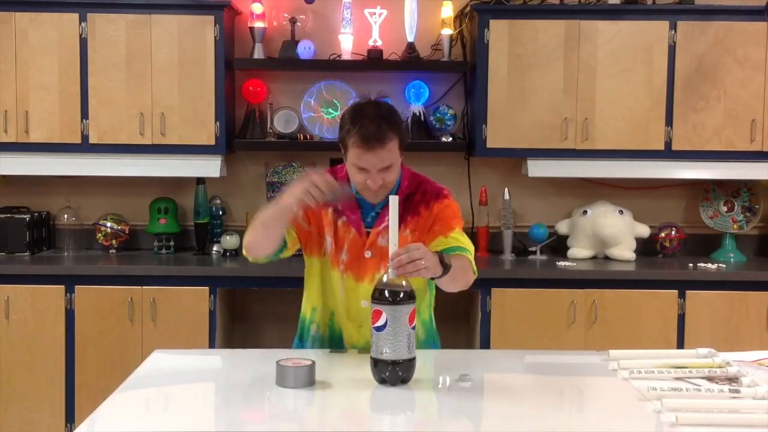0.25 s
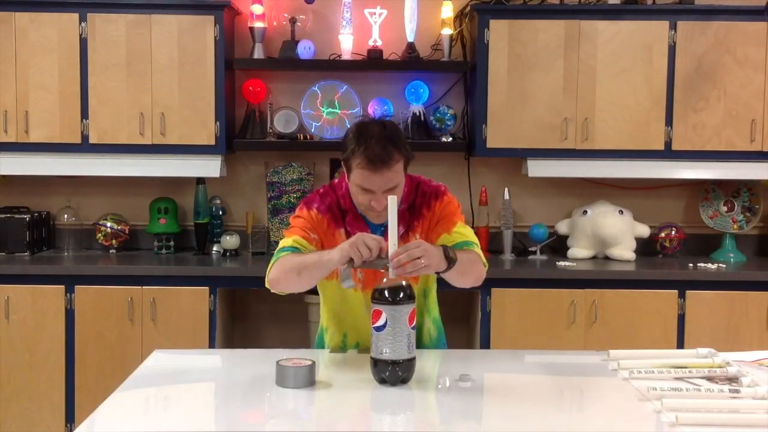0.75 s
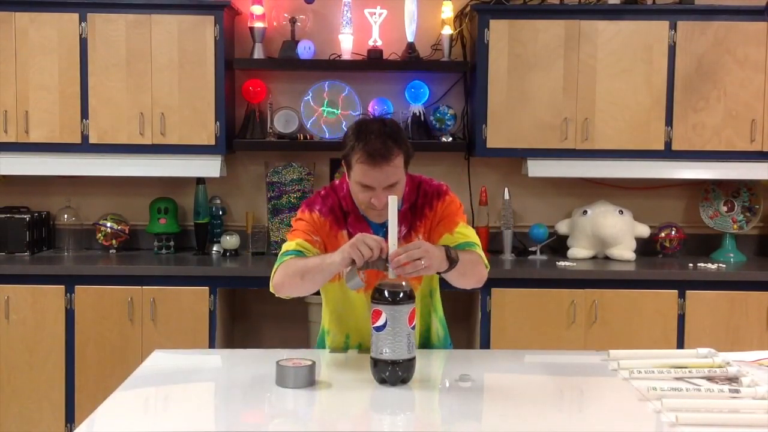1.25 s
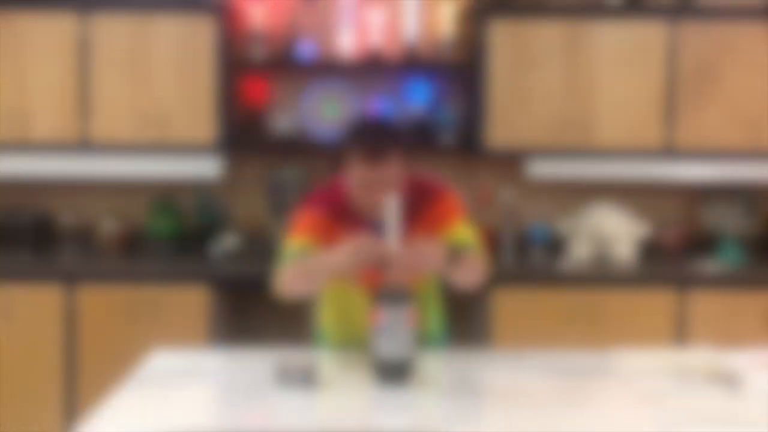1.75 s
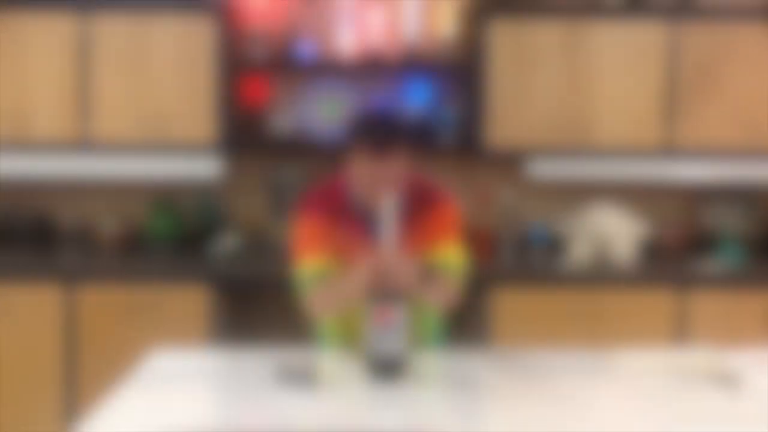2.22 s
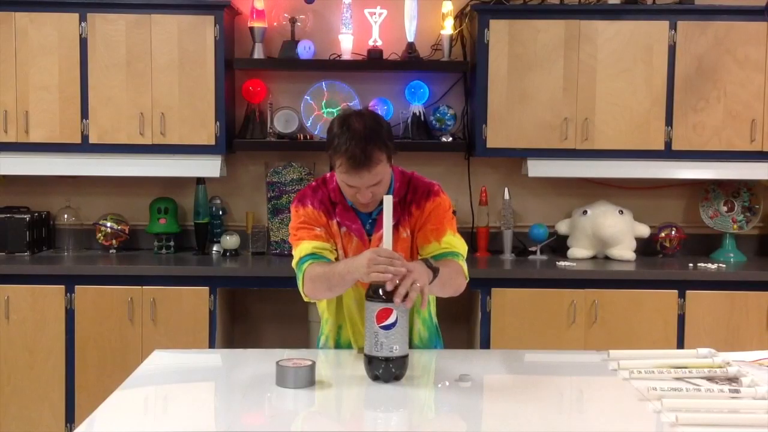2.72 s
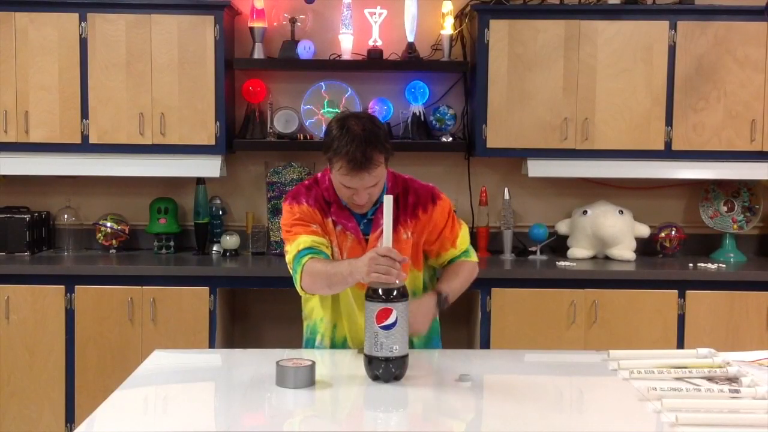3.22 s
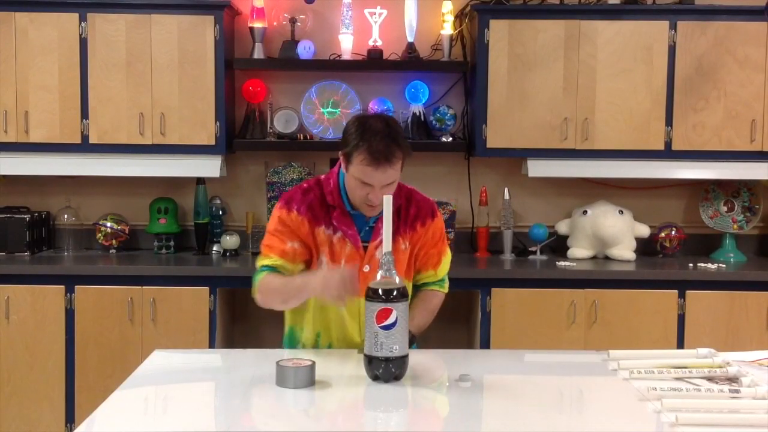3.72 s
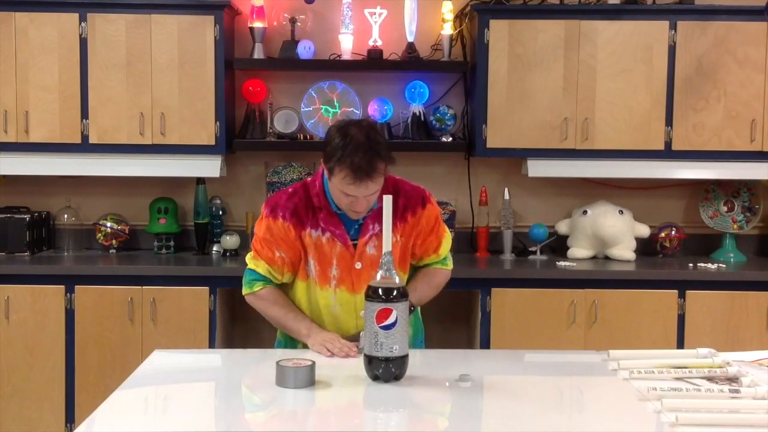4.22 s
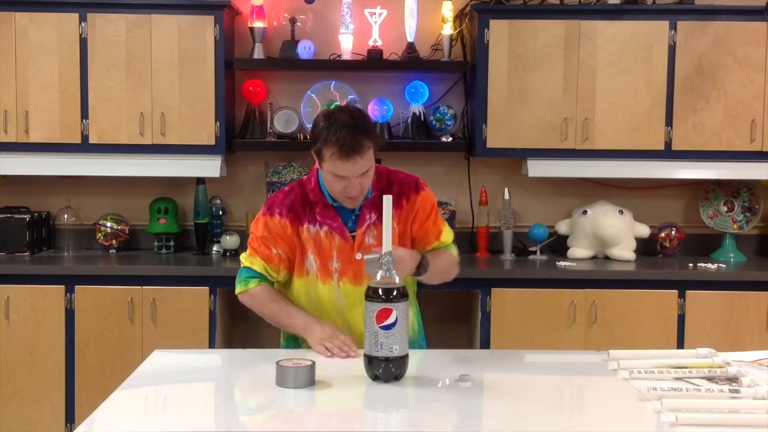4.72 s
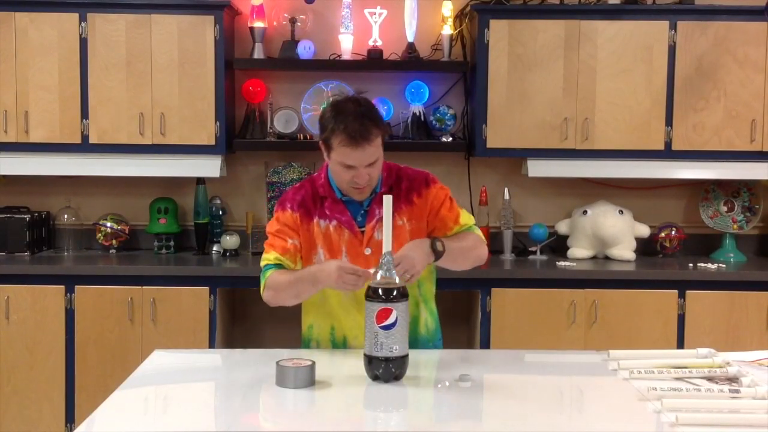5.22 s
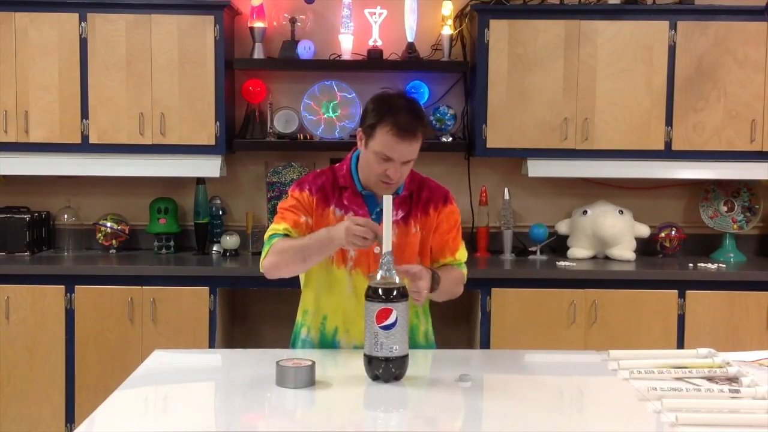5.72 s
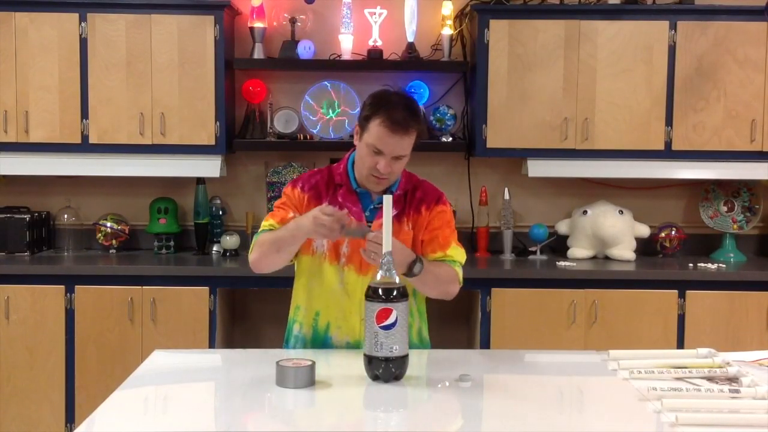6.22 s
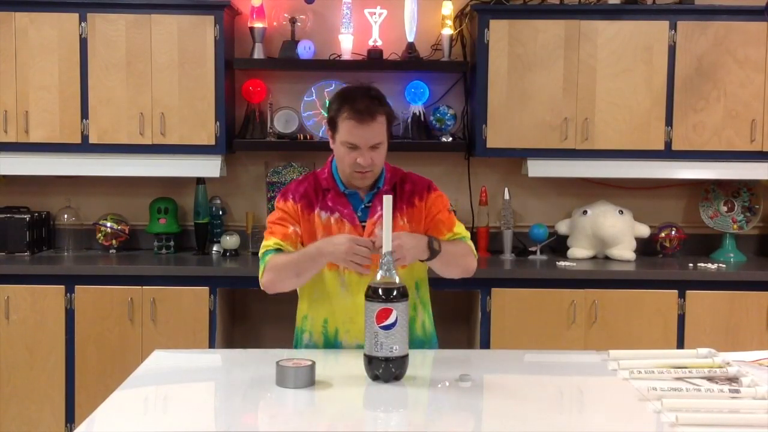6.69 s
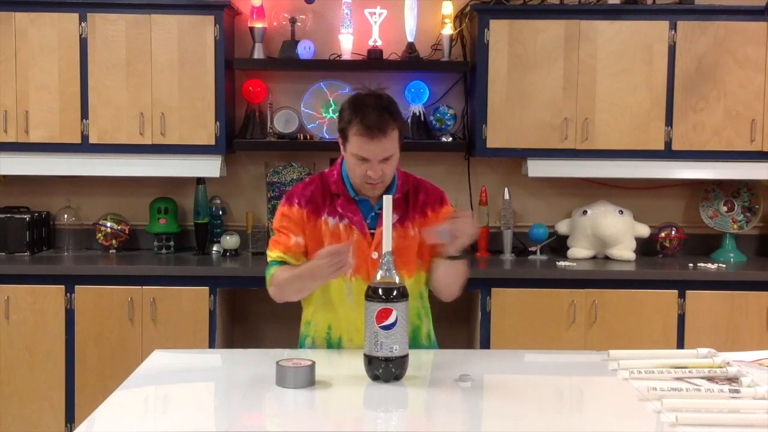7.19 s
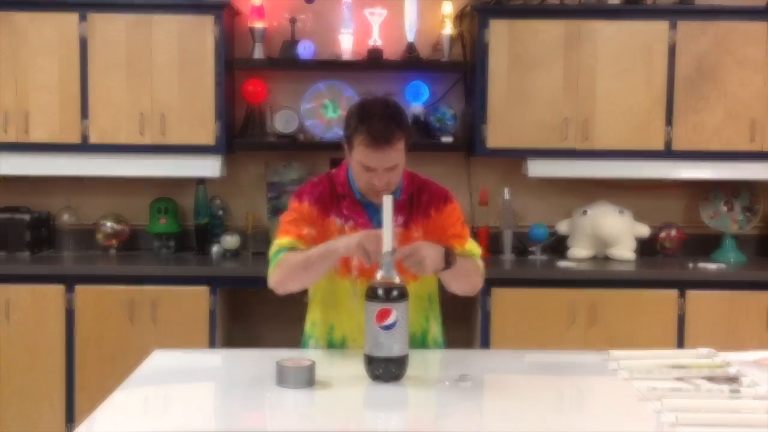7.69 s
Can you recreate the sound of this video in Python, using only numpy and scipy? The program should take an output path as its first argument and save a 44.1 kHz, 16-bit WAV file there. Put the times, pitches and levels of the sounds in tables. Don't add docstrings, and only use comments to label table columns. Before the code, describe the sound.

Heard from a few metres by a camera microphone: quiet humming lamps and hiss, dipping briefly early on. Fingers make tiny tape clicks and creases; midway, strong tape is yanked from the roll in stuttering, dry rips with bright room reflections. Sparse sticky ticks follow, one of them brighter, then the strip is torn across in one rapid zip, trailing small crinkles.

```python
import sys
import numpy as np
from scipy import signal
from scipy.fft import rfft, irfft, next_fast_len
from scipy.io import wavfile
from scipy.ndimage import map_coordinates

SR = 44100
rng = np.random.default_rng(int(sys.argv[2]) if len(sys.argv) > 2 else 0)


def voltage_ratio(level):
    return 10 ** (np.asarray(level, float) / 20)


def materialize(psi):
    bounded = np.clip(np.atleast_2d(psi).T, -1, 1)
    quanta = np.round(bounded * 32767).astype(np.int16)
    wavfile.write(sys.argv[1], SR, quanta)


N = 350585


def unit(x):
    return x / np.sqrt(np.mean(x ** 2) + 1e-20)


def along(points, hz):
    f, v = np.transpose(points)
    return np.interp(np.log(hz + 1), np.log(f + 1), v)


def wobble(rate):
    knots = rng.standard_normal(int(N * rate / SR) + 4)
    return map_coordinates(knots, [np.arange(N) * rate / SR])


def filtered(x, response):
    m = next_fast_len(len(x) + 4096)
    return irfft(rfft(x, m) * response(np.fft.rfftfreq(m, 1 / SR)), m)[:len(x)]


def toned(x, points):
    return filtered(x, lambda f: voltage_ratio(along(points, f)))


def modes(rows):
    def response(f):
        total = 0
        for k, (centre, width, db) in enumerate(rows):
            damping = 1j * f * width
            total = total + (-1) ** k * voltage_ratio(db) * damping / (centre * centre - f * f + damping)
        return total
    return response


def slips(size, rate, scatter_db):
    when, sign, big = rng.random((3, size))
    return (when < rate / SR) * np.sign(sign - 0.5) * voltage_ratio(-scatter_db * np.log(1.03 - big))


# (frequency [Hz], level [dB per Hz])
CRACKLE_TONE = [(150, -24), (500, -6.5), (2000, -5.5), (5000, -5), (9000, -7), (13000, -4.5), (15500, -10)]


def crackle(x):
    return unit(toned(x, CRACKLE_TONE))


# (frequency [Hz], width [Hz], level [dB])
ROLL_MODES = [(305, 77, 7), (457, 32, 10.5), (530, 205, 4.5), (988, 127, 11), (1290, 110, -9)]


def roll(x, body_db, hz, crackle_db):
    push = voltage_ratio(body_db + 0.52 * crackle_db) / (1 + (hz / 4500) ** 2)
    return push * unit(filtered(x, modes(ROLL_MODES)))


def bursts(rows, rate, scatter_db, sharp, body_db):
    out, t = np.zeros(N + SR), np.arange(SR // 5) / SR
    for s, db, length, hz, crackle_db in rows:
        rise = np.clip(t / (0.17 * length), 0, 1)
        fall = np.clip((length - t) / (0.47 * length) + 0.5, 0, 1)
        train = slips(len(t), rate, scatter_db)
        fine = slips(len(t), 3 * rate, scatter_db / 2)
        sound = unit(filtered(train, modes([(hz, hz / sharp, 0)])))
        sound += voltage_ratio(crackle_db) * crackle(train + fine)
        sound += roll(train, body_db, hz, crackle_db)
        out[round(s * SR):][:len(t)] += voltage_ratio(db) * rise * fall * sound
    return out[:N]


# (time [s], level [dB], length [s], strip resonance [Hz], crackle [dB])
JERK_PULLS = [
    (4.299, -38, 0.009, 2570, 3),
    (4.327, -41, 0.008, 2200, 7.5),
    (4.340, -47, 0.034, 1950, 4.5),
    (4.369, -35, 0.0095, 2100, -1.5),
    (4.384, -49, 0.014, 1300, -2),
    (4.427, -43, 0.012, 1800, 0.5),
    (4.499, -51.5, 0.0066, 4450, -13),
    (4.550, -36.5, 0.0096, 1520, -1.5),
    (4.561, -39.5, 0.029, 1530, 2),
    (4.583, -38, 0.012, 1190, -22),
]


def jerks():
    return bursts(JERK_PULLS, rate=3000, scatter_db=2.0, sharp=2.25, body_db=-2)


# (time [s], level [dB])
TEAR_LEVEL = [
    (7.12, -75.5),
    (7.143, -59.5),
    (7.155, -57),
    (7.162, -38.5),
    (7.173, -31),
    (7.181, -35.5),
    (7.2, -39.5),
    (7.214, -47),
    (7.23, -65),
]
# (frequency [Hz], level [dB per Hz])
WEAVE_TONE = [(180, -48), (300, -8), (360, -13.5), (935, -9), (1180, -3), (1930, -6.5), (3800, -3.5),
              (15400, -12)]
# (frequency [Hz], width [Hz], level over the broad tone [dB])
FLAP_MODES = [(1130, 270, 2), (2230, 300, 6), (3820, 280, 0), (5300, 450, -1), (6360, 320, 5)]


def tear():
    t = np.arange(N) / SR
    s, level = np.transpose(TEAR_LEVEL)
    db = np.interp(t, s, level)
    rate = 1220 + (1275 - 1220) * voltage_ratio(2 * (db - db.max()))
    turns = np.cumsum(rate * (1 + 0.07 * wobble(300))) / SR
    threads = np.diff(np.floor(turns), prepend=0) * voltage_ratio(1.3 * rng.standard_normal(N))
    train = unit(threads) + 1.9 * unit(slips(N, 14000, scatter_db=3.0))
    inside = np.interp(t, [s[0], s[-1]], [1, 1], 0, 0)

    def strip(f):
        return voltage_ratio(along(WEAVE_TONE, f)) * (1.5 + sum(modes([m])(f) for m in FLAP_MODES))
    return inside * voltage_ratio(db) * unit(filtered(train, strip))


def snaps(rows, second, body_db):
    out, t = np.zeros(N + SR), np.arange(SR // 20) / SR
    decay = voltage_ratio(-60 * t / 0.011)
    for s, db, hz, crackle_db in rows:
        crack = (t == 0) + 0.3 * decay * rng.standard_normal(len(t))
        spray = np.minimum(t / 0.0015, 1) * decay * rng.standard_normal(len(t))
        high = second * hz
        ring = unit(filtered(crack, lambda f: modes([(hz, hz / 2.2, 0)])(f) ** 2))
        ring += voltage_ratio(-5.5) * unit(filtered(crack, lambda f: modes([(high, high / 3.2, 0)])(f) ** 2))
        ring += voltage_ratio(crackle_db) * crackle(spray)
        ring += roll(crack, body_db, hz, crackle_db)
        out[round(s * SR):][:len(t)] += voltage_ratio(db) * ring / abs(ring).max()
    return out[:N]


# (time [s], peak level [dB], first mode [Hz], crackle [dB])
BOTTLE_PRESSES = [
    (2.989, -53, 1790, 2),
    (4.4275, -26, 1940, -2),
    (5.319, -53, 2980, 7),
    (5.701, -42, 2160, 6),
    (6.185, -50.5, 2660, -8),
    (6.295, -35.5, 6930, -1.5),
    (6.742, -53, 2640, -13),
    (6.869, -50, 2701, -6),
    (7.815, -58, 5200, -7),
    (7.855, -54, 10200, -8),
]


def presses():
    return snaps(BOTTLE_PRESSES, second=0.6236, body_db=-1.0)


# (time [s], peak level [dB], first mode [Hz], crackle [dB])
TAPE_CREASES = [(1.264, -51, 1670, 4), (1.578, -60, 930, -14), (2.76, -41, 3130, -10),
                (3.229, -44, 1910, -5), (3.357, -66, 1860, -8), (4.041, -42, 425, -9),
                (4.05, -46, 305, -25), (4.081, -49, 1600, -6), (4.202, -56, 1600, -8),
                (4.216, -50, 1600, 2), (4.242, -58, 2800, -8), (4.5499, -20, 1680, 1),
                (5.667, -49, 3120, 4), (6.141, -53, 3070, -8), (6.252, -56, 2598, -8),
                (6.334, -43, 2060, -2), (7.384, -41, 3500, 2), (7.395, -42, 2940, -15),
                (7.44, -42, 2380, -10), (7.606, -35.5, 5600, 0.5)]


def creases():
    return snaps(TAPE_CREASES, second=1.79, body_db=-15)


# (time [s], level [dB], length [s], strip resonance [Hz], crackle [dB])
SLOW_PEELS = [(2.47, -74, 0.1, 1980, 3.5), (2.765, -72, 0.044, 3200, -22), (3.23, -73.5, 0.064, 2030, 3),
              (3.33, -72, 0.047, 2020, 2), (3.88, -73.5, 0.09, 1900, -20), (4.04, -67.5, 0.064, 920, -14),
              (4.2, -75, 0.16, 2190, 6.5), (5.31, -80, 0.086, 2950, 8), (5.45, -82.5, 0.061, 2995, 10),
              (5.668, -61.5, 0.022, 3000, 5.5), (6.11, -72.5, 0.09, 3000, 0.5),
              (6.285, -65.5, 0.036, 4160, 7), (6.33, -68, 0.022, 2100, 10), (7.385, -61, 0.028, 3150, 2),
              (7.425, -57, 0.031, 2530, -0.5), (7.80, -73.5, 0.037, 4400, -3),
              (7.85, -78.5, 0.014, 9500, 14), (7.925, -77.5, 0.044, 9600, 12)]


def peels():
    return bursts(SLOW_PEELS, rate=4900, scatter_db=3.0, sharp=0.89, body_db=-9)


# (frequency [Hz], time to fall 60 dB [s])
ROOM_DECAY = [(200, 0.62), (1000, 0.47), (4000, 0.45), (8000, 0.4), (14000, 0.34)]


def tail(size):
    hz, t, z = signal.stft(rng.standard_normal(size), SR, nperseg=256)
    decay = voltage_ratio(-60 * t / along(ROOM_DECAY, hz)[:, None])
    x = signal.istft(z * decay, SR, nperseg=256)[1][:size]
    return x / np.linalg.norm(x)


# (delay [s], level [dB])
NEAR_ECHOES = [(.0011, -25), (.0023, -51), (.0037, -12), (.0052, -25), (.0078, -10), (.0115, -15),
               (.016, -9)]


def room(x):
    out, step = np.zeros(N + SR), SR // 10
    for start in range(0, N, step):
        piece = x[start:start + step]
        if np.any(piece):
            wet = signal.fftconvolve(piece, tail(SR * 3 // 5))
            out[start + round(0.003 * SR):][:len(wet)] += voltage_ratio(-3) * wet

    def near(f):
        return sum((-1) ** k * voltage_ratio(db) * np.exp(-2j * np.pi * f * s) for k, (s, db) in enumerate(NEAR_ECHOES))
    return out[:N] + filtered(x, near)


# (frequency [Hz], level [dB per Hz])
KNOCK_TONE = [(100, -19), (200, -9), (350, -7), (520, -8), (850, -21), (2000, -21), (4000, -25),
              (9000, -37.5)]


def last_knock():
    x = toned(tail(SR // 2), KNOCK_TONE)
    return np.pad(voltage_ratio(-17.5) * x / np.linalg.norm(x), (0, N - len(x)))


# (frequency [Hz], level [dB])
HUM_HARMONICS = [(119.9, -23.5), (239.8, -30.5), (359.7, -2.5), (479.6, -8.5), (719.4, -28), (839.3, -33)]


def lamp_hum():
    t, hum = np.arange(N) / SR, 0
    for hz, db in HUM_HARMONICS:
        level = voltage_ratio(db + 0.2 * wobble(3.4)) * np.sqrt(2)
        hum = hum + level * np.sin(2 * np.pi * (hz * t + rng.random()) + 0.59 * wobble(7.7))
    return voltage_ratio(-57.5) * hum


# (frequency [Hz], width [Hz], level [dB])
DRIVER_WHINES = [(3765, 90, -85.5), (3880, 85, -87.5)]


def lamp_whine():
    whine = 0
    for hz, width, db in DRIVER_WHINES:
        band = filtered(rng.standard_normal(N), lambda f: modes([(hz, width, 0)])(f) ** 2)
        whine = whine + voltage_ratio(db + 2.8 * wobble(25)) * unit(band)
    return whine


# (frequency [Hz], level [dB per Hz])
VENT_TONE = [(20, -47), (80, -32.5), (115, -12), (230, -8.5), (310, -14), (550, -21.5), (1000, -26.5),
             (4000, -39.5)]
# (frequency [Hz], level [dB per Hz])
HISS_TONE = [(20, -13), (1000, -0.5), (2000, 1.5), (3700, -0.5), (9000, -1.5), (15500, 0)]


def air():
    rumble = voltage_ratio(-67) * unit(toned(rng.standard_normal(N), VENT_TONE))
    hiss = voltage_ratio(-68.5) * unit(toned(rng.standard_normal(N), HISS_TONE))
    return rumble + hiss


def background():
    dip = np.interp(np.arange(N) / SR, (1.67, 2.1, 2.52), [0, 1, 0])
    return voltage_ratio(-4.5 * dip) * lamp_hum() + voltage_ratio(-2.5 * dip) * (air() + lamp_whine())


def scene():
    tape = jerks() + tear() + presses() + creases() + peels()
    sounds = tape + room(tape) + last_knock()
    near = filtered(sounds, lambda f: (1j * f / (130 + 1j * f)) ** 3)
    return (near + background())[None]


def low_pass(x):
    return signal.sosfilt(signal.butter(12, 16120, fs=SR, output="sos"), x)


def record(dry):
    top = 15380
    mix = filtered(dry[0], lambda f: voltage_ratio(np.interp(f, [top, top + 150, top + 700], [0, -22, -60])))[None]
    return low_pass(mix)


dry = scene()
out = record(dry)
materialize(out)
```